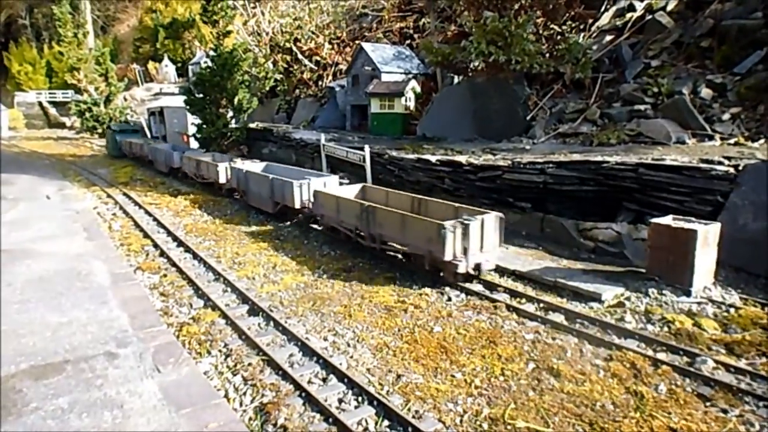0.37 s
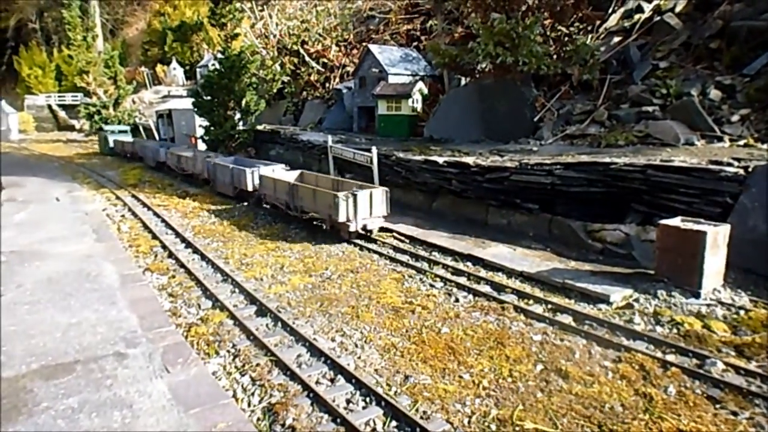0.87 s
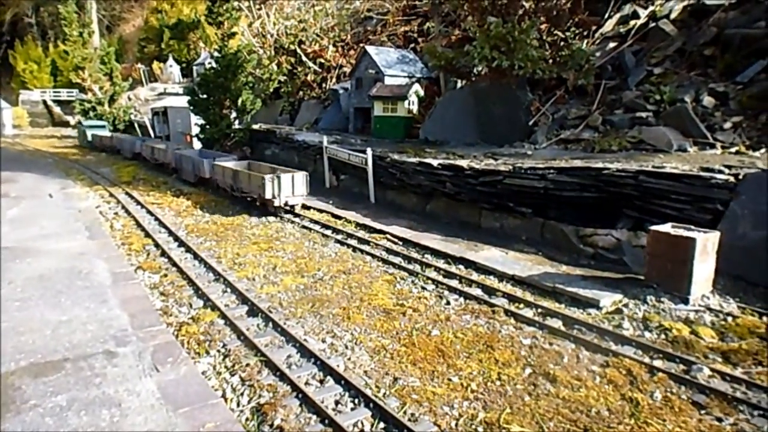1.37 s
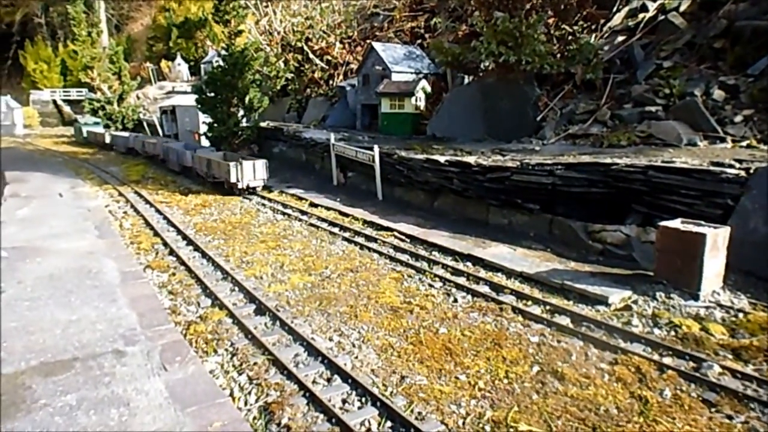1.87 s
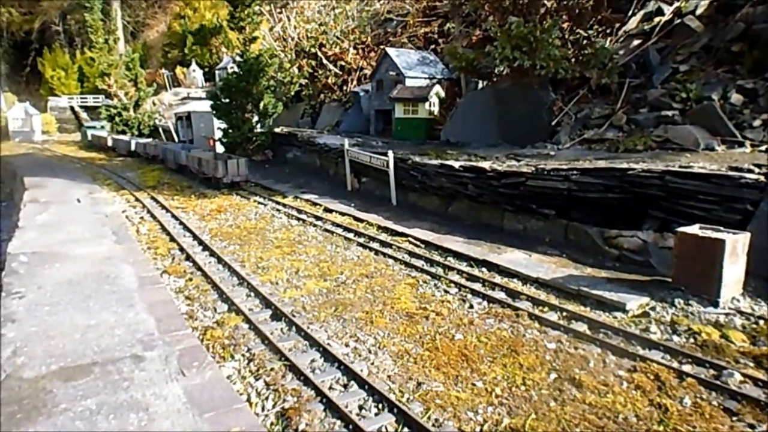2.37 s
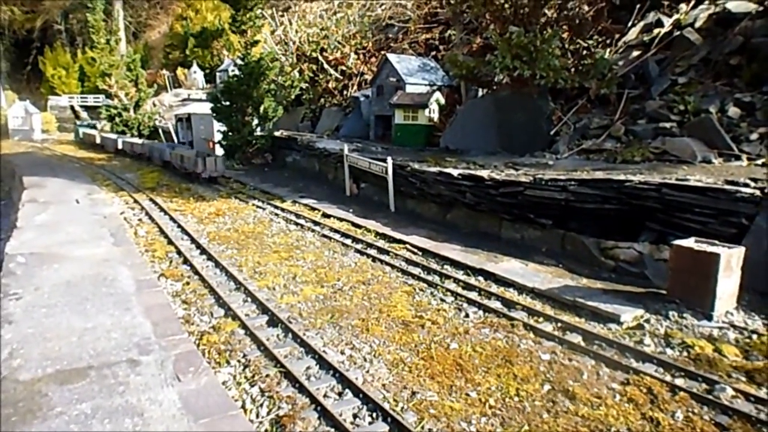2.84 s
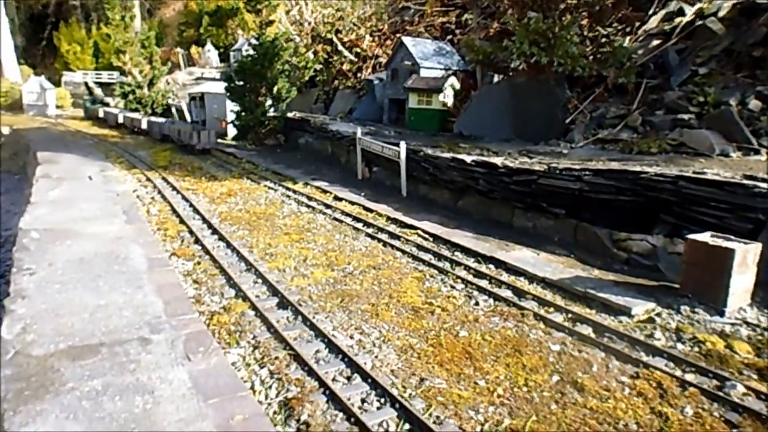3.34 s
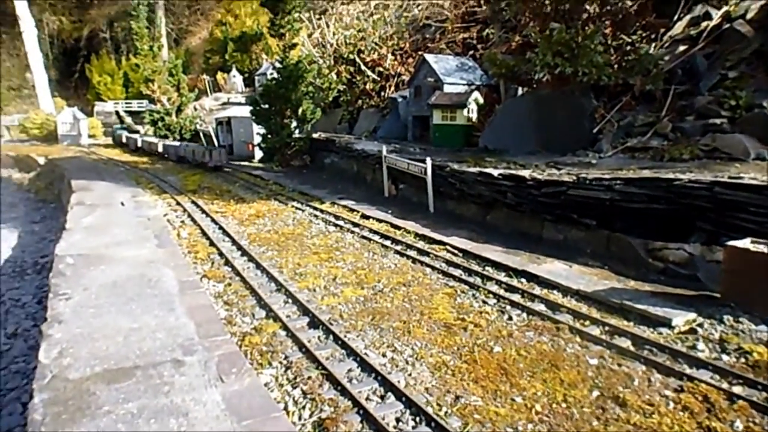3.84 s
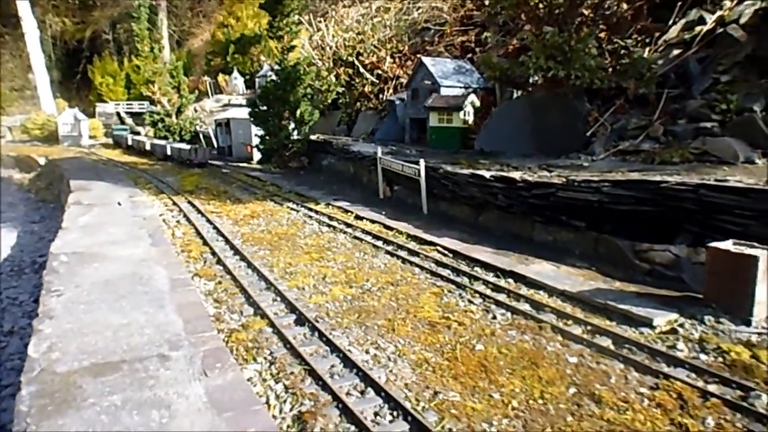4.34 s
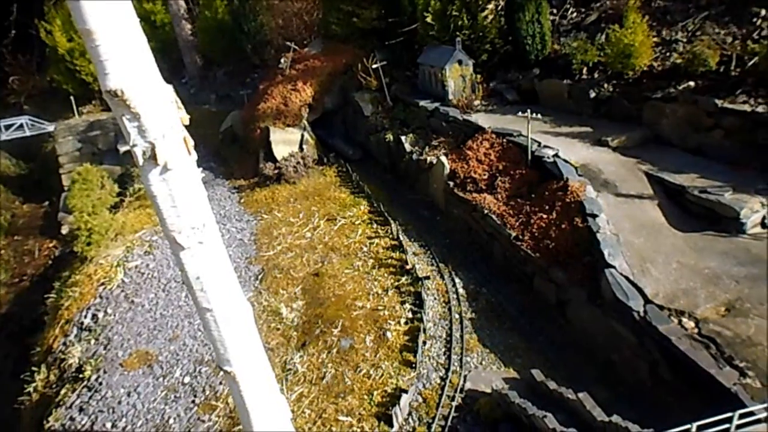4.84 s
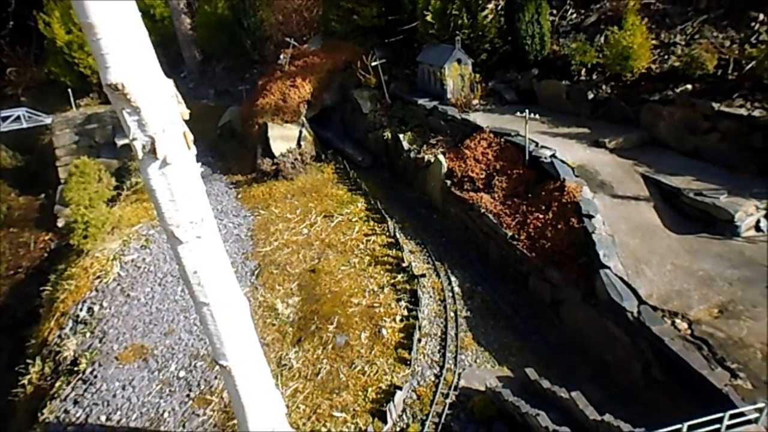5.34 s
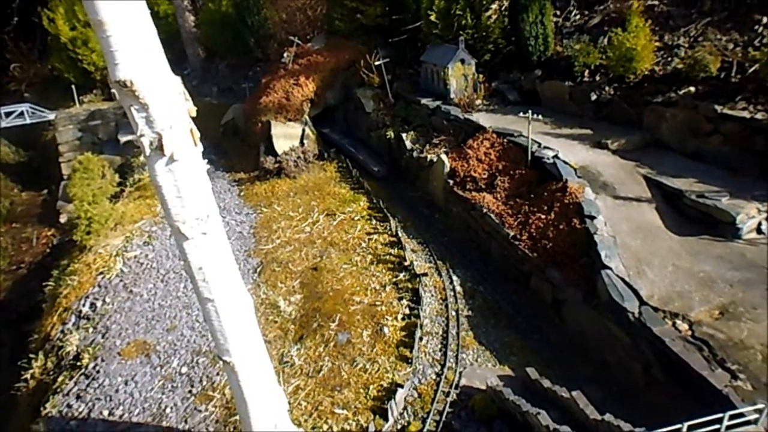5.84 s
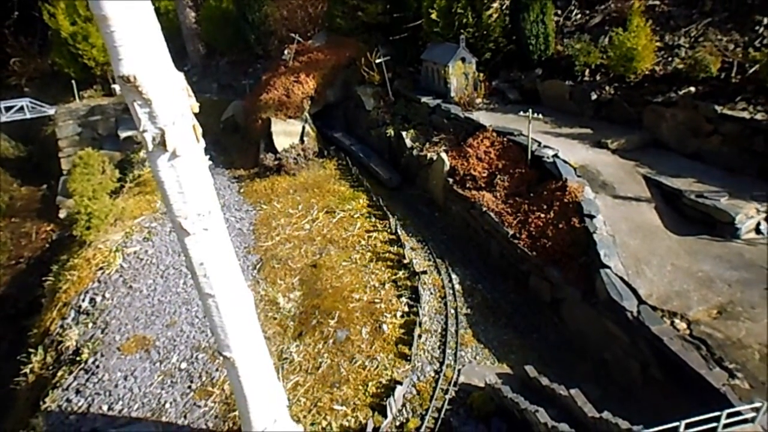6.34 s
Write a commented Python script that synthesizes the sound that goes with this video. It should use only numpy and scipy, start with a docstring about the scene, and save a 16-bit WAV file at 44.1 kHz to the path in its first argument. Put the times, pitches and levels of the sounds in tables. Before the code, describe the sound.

Outdoors at trackside, a model train clatters past and recedes: quick clacks of axles, wagon bodies and wheel rims over a grainy rolling hiss. Gusts buffet the unprotected microphone, then ease. Brief squeaky creaks and a bump from a hand end this part. The sound switches suddenly to a distant view, where a soft low hum and muffled roar continue with small thuds, light ticks and thin bird whistles.

```python
"""Beside a garden track, close to the rails, a small train of open wagons rolls away: shaped noise hisses and
rumbles, knocks ring axles, wagon bodies and wheels, and wind pushes on the microphone. Gliding tones whistle
as birds from afar; a hand makes the microphone housing tick, creak and sing. At 4.49 s the place becomes high
above a tunnel mouth: two wavering sines hum as a distant engine under a dull noise roar with thuds, while the
train still ticks far off."""
import sys
import numpy as np
from scipy import signal
from scipy.fft import rfft, irfft, next_fast_len
from scipy.io import wavfile
from scipy.ndimage import map_coordinates

SR = 44100
rng = np.random.default_rng(int(sys.argv[2]) if len(sys.argv) > 2 else 0)


def undo_db(level):
    """Turn decibels back into plain size, where 20 dB means ten times bigger."""
    steps = np.asarray(level, float) / 20
    return 10 ** steps


def wav_record(signal):
    """Record a signal, one row per channel, as 16-bit PCM in the file named by sys.argv[1]."""
    frames = np.transpose(np.atleast_2d(signal))
    bounded = np.clip(frames, -1, 1)
    # unit amplitude maps onto the largest positive 16-bit level
    quanta = np.round(bounded * 32767).astype(np.int16)
    wavfile.write(sys.argv[1], SR, quanta)


N = 284445
MOVE_S = 4.49  # the listening place changes from trackside to high above the tunnel mouth

# knocks of wheels and couplings; from 4.353 to 4.438 s ticks of the hand on the housing;
# before the trims of each ringing part: t/s, level/dB, wagon body over level/dB, wheel ring over level/dB
KNOCK_TABLE = [(0.022, -17.5, -16, -14), (0.037, -19, -9, -17), (0.048, -14.5, -10, -17),
               (0.0647, -14, -11, -16), (0.077, -15, -12, -4.5), (0.1045, -9.5, -6.5, -6.5),
               (0.118, -25, -16, -25), (0.131, -16.5, -11, -8.5), (0.142, -22, -12, -24),
               (0.17, -21.5, -11, -7), (0.191, -11, -13, -15), (0.2107, -22, -6, -18), (0.23, -10, -9, -10),
               (0.249, -13, 0, -15), (0.26, -14, -14, -13), (0.267, -16.5, -8, -8), (0.28, -16, -9, -9),
               (0.307, -22, -14, -4), (0.322, -21, -25, -16), (0.335, -22, -1, -19), (0.373, -19.5, -3, -2),
               (0.382, -17, 0, -16.5), (0.4209, -22.5, 2, -2.5), (0.467, -40, -3, 1.5),
               (0.4792, -27, -3, 2), (0.518, -18, -1, -16), (0.548, -21, -3, -24),
               (0.5662, -21.5, -9, -10.5), (0.5837, -23, -18, -12), (0.594, -24, -12, -4),
               (0.6215, -23.5, 1.5, -6), (0.687, -15, -8, -18), (0.707, -18.5, 0, -12),
               (0.763, -18.5, -9, -9), (0.8, -22, -16, -12), (0.82, -19, -19, -10), (0.852, -24.5, -10, 0),
               (0.887, -38, -10, 0), (0.902, -24, -12, -4), (0.916, -29, -13, -4), (0.9475, -21.5, -8, -3),
               (0.96, -21.5, -3, -12), (0.988, -19, -5, -8), (1.013, -29, -10, -2), (1.042, -25.5, -2, -7),
               (1.052, -27, -7, -7), (1.066, -23, -4, -13), (1.085, -18, -7, -16), (1.104, -16, -11.5, -11),
               (1.1194, -21.5, 0, 0), (1.135, -32, 4, -12), (1.165, -34, -12, -18), (1.188, -22.5, 4, -14),
               (1.227, -22.5, -9, -6), (1.239, -22, -7, -6), (1.252, -26, -5, -12), (1.354, -22, -20, -18),
               (1.361, -17.5, -13, -9), (1.4072, -25.5, 0, -15), (1.4561, -31, -11, -1),
               (1.511, -21, -2, -15), (1.5486, -22.5, 4.5, -12), (1.5668, -22.5, -13, -4),
               (1.6306, -21, -7, -20), (1.64, -23, -8, -18), (1.6855, -22, -13, -27), (1.738, -30, 3, -10),
               (1.775, -26, 1, -8), (1.8023, -25, -1, -11), (1.818, -19, -8, -13), (1.838, -30, -5, -4),
               (1.851, -25, 4, -3), (1.8728, -21, -6, -12), (1.89, -26, -7, -12),
               (1.9333, -20.5, -8, -10.5), (1.963, -23, -16, -16), (1.9992, -16.5, -7, -10),
               (2.026, -27, -2, -16), (2.083, -30, 2, -9), (2.1223, -33, -15.5, -3), (2.2985, -30, 9.5, -8),
               (2.3107, -24, -3, -12), (2.402, -24, -9, -7), (2.452, -23, -1, -17), (2.553, -30, 4.5, -13),
               (2.573, -25, -4, -15), (2.62, -26.5, -1.5, -23), (2.704, -27.5, 3, -1.5),
               (2.859, -25, 1, -8), (2.9404, -25.5, 0, -4), (3.0598, -24, -19, -1), (3.123, -27, -12, -19),
               (3.15, -28, -5, -29), (3.2107, -24, -10, -10), (3.3027, -24, -14, -12), (3.41, -25, -2, -10),
               (3.448, -26.5, 2, -20), (3.492, -16, -6.5, -9), (3.5217, -24.5, -18, -24),
               (3.545, -32, -12, -9), (3.607, -30, -12, 2), (3.616, -25, -6, -2), (3.679, -29, 0, -4),
               (3.838, -28.5, 4, 4.5), (3.894, -24.5, -6, -12), (3.92, -33, 1, 4.5), (3.948, -27.5, 0, -3),
               (3.967, -35.5, -11, 4), (4.077, -36, 3, -15), (4.112, -21.5, -10, -12),
               (4.219, -21, -15, -10.5), (4.271, -30, -6, -9), (4.314, -31, 2, -14),
               (4.353, -35.5, -10, 3.5), (4.367, -36, -6, 6), (4.3878, -29, -3, 2), (4.411, -36, -2, -2),
               (4.438, -22, -26, -20), (4.533, -34, -7, -12), (4.644, -32.5, 5, -6),
               (4.6863, -29.5, -8, -7), (4.781, -25, -9, -24), (5.031, -33.5, -7, -11),
               (5.086, -28.5, -2.5, -7), (5.218, -31, -13, -22), (5.23, -26, -19, -8),
               (5.3508, -32, -14, -7.5), (5.3883, -25.5, -20, -10), (5.5074, -31, -11, -15),
               (5.5288, -27, -14, -22), (5.542, -31, -13, -11), (5.797, -38, -14, -9),
               (5.838, -34, -14, -14), (5.95, -36, -17, -4), (6.069, -44, 2, -14), (6.179, -32.5, 4.5, -9),
               (5.8914, -43, -10, 8), (6.2864, -29.5, -12, -8), (6.346, -31, 3, 2)]


def unit(x):
    """Scaled to rms 1."""
    return x / np.sqrt(np.mean(x ** 2) + 1e-20)


def curves(rows):
    """One value per sample for each column, and a gate that is open while the table lasts."""
    s, *columns = np.transpose(rows)
    t = np.arange(N) / SR
    gate = np.clip(np.minimum(t - s[0], s[-1] - t) / 0.004 + 1, 0, 1)  # 4 ms ramps outside the table
    return [np.interp(t, s, column) for column in columns] + [gate]


def wobble(rate):
    """A smooth random curve, rate knots a second."""
    knots = rng.standard_normal(int(N * rate / SR) + 4)
    return map_coordinates(knots, [np.arange(N) * rate / SR])


def swells(s, db, rise_s, fall_s, base_db):
    """dB over time: a base plus, in power, swells that rise and fall by 10 dB in rise_s and fall_s."""
    t = np.arange(0, N, 32) / SR  # a coarse grid is enough for slow curves
    late = t - np.asarray(s)[:, None]
    rising = -late / np.reshape(rise_s, (-1, 1))
    falling = late / np.reshape(fall_s, (-1, 1))
    slope = np.where(late < 0, rising, falling)
    power = undo_db(2 * (np.asarray(db)[:, None] - 10 * slope)).sum(axis=0)
    return 10 * np.log10(np.interp(np.arange(N) / SR, t, power) + undo_db(2 * base_db))


def filtered(x, response):
    """x times a complex response of frequency."""
    m = next_fast_len(N + 8192)
    return irfft(rfft(x, m) * response(np.fft.rfftfreq(m, 1 / SR)), m)[:N]


def noise(spectrum):
    """Noise of rms 1 with a (Hz, dB) spectrum, interpolated over log frequency."""
    f, db = np.transpose(spectrum)
    return unit(filtered(rng.standard_normal(N),
                         lambda hz: undo_db(np.interp(np.log(hz + 1), np.log(f + 1), db))))


def resonance(hz, width):
    """Causal response of one mode, applied twice for steep skirts."""
    return lambda f: (1j * f * width / (hz * hz - f * f + 1j * f * width)) ** 2


def rung(force, modes):
    """Contact noise under a force curve, one row per mode, rings the modes; rms 1 for a force of 1."""
    tone = 0
    for push, (hz, width, db) in zip(force, modes):
        contact = push * rng.standard_normal(N)
        tone = tone + undo_db(db) / np.sqrt(width) * filtered(contact, resonance(hz, width))
    mode_power = np.sum(undo_db(np.transpose(modes)[2]) ** 2)
    return tone / np.sqrt(np.pi / 2 / SR * mode_power)


def struck(times, dbs, modes, spot_db, short):
    """Each blow is a brief swell of contact noise with a faint tail; its spot sets mode levels and delays."""
    u = np.arange(SR // 10) / SR / short
    swell = u ** 3 * np.exp(-1.2 * u)
    tail = 0.3 * (1 - np.exp(-u)) ** 3 * np.exp(-u / 8)
    chatter = swell + tail
    spots, lags = rng.standard_normal((len(times), 2, len(modes))).transpose(1, 2, 0)
    blows = []
    for spot, lag in zip(spots, lags):
        at = np.abs((times + short * (lag - 1)) * SR).astype(int)
        blows.append(np.bincount(at, undo_db(dbs + spot_db * spot), N)[:N])
    force = signal.fftconvolve(blows, [chatter / chatter.max()], axes=1)[:, :N]
    return rung(force, modes)


def whistle(rows, flutter_db, waver):
    """A thin tone along (s, Hz, dB rms) rows, unsteady in level and pitch."""
    hz, db, gate = curves(rows)
    turn = 2 * np.pi * np.cumsum(hz * (1 + waver * wobble(210))) / SR
    return np.sqrt(2) * gate * undo_db(db + flutter_db * wobble(90)) * np.sin(turn)


def rolling_hiss(roll_db):
    """Wheels hiss on the rails: shaped noise whose level flickers at three speeds."""
    # hiss spectrum: f/Hz, relative density/dB
    spectrum = [(120, -33.5), (200, -0.5), (441, -9), (1020, -1), (1280, -7.5), (1510, -3), (2050, -8.5),
                (2320, -6), (3550, -13.5), (5270, -16), (7600, -20), (9880, -55), (16700, -120)]
    flicker_db = 1.6 * wobble(5.13) + 1.1 * wobble(19) + 1.1 * wobble(60)
    return undo_db(roll_db - 2.0 + flicker_db) * noise(spectrum)


def track_rumble(lost_db):
    """The track bed rumbles: low noise that loses 0.79 dB for each dB of rolling lost."""
    # rumble spectrum: f/Hz, relative density/dB
    spectrum = [(41, -40), (70, -6.5), (122, 1.5), (188, -12), (260, -17.5), (340, -21.5), (570, -120)]
    return undo_db(-36 + 0.79 * lost_db + 1.5 * wobble(25.11)) * noise(spectrum)


def wagon_boom():
    """The hollow wagons boom steadily and at each knock, both dropping as the train draws away."""
    # boom of the hollow wagons: f/Hz, width/Hz, level/dB
    modes = [(504, 320, 0)]
    drop_db_per_s = -8
    t = np.arange(N) / SR
    steady_db = np.maximum(-39 + drop_db_per_s * t, -56.5)  # never below the second figure
    steady = rung([undo_db(steady_db + 2.4 * wobble(21))], modes)
    s, db, body_db, _ = np.transpose(KNOCK_TABLE)
    knock_db = db + body_db - 11.5 + drop_db_per_s * s
    return steady + struck(s, knock_db, modes, spot_db=3.5, short=0.0016)


def hum(roll_db):
    """Wagons hum, loudest with open ends to the listener; a rail note and a broad axle band follow the rolling."""
    # one wagon mode, one rail note, one broad rattling axle band: f/Hz, width/Hz, level/dB
    modes = [(857, 200, 0.45), (1031, 67, -1.8), (2530, 750, -0.14)]
    peak_s, span_s = 1.25, 1.19  # time of the peak, time from it to lose 6 dB
    t = np.arange(N) / SR
    wagon_db = -38 - 6 * ((t - peak_s) / span_s) ** 2 + 0.82 * wobble(5.6)
    levels_db = (wagon_db, roll_db - 6.0, roll_db - 7.5 + 2.8 * wobble(12))
    return rung([undo_db(db + 1.26 * wobble(24.88) + 1.8 * wobble(80)) for db in levels_db], modes)


def clatter(times, db, body_db, wheel_db, spot_db):
    """A knock sounds in the axle, the wagon body and the wheel rims together."""
    # ringing modes of the axles: f/Hz, width/Hz, level/dB
    axle_modes = [(2375, 314, 2.5), (2719, 380, 0), (3048, 420, 0.5), (3495, 530, -6), (3950, 580, -4)]
    # ringing modes of the wagon bodies: f/Hz, width/Hz, level/dB
    body_modes = [(811, 540, 1), (1043, 260, -1.5), (1479, 330, 1), (1890, 470, -2.5)]
    # ringing modes of the wheel rims: f/Hz, width/Hz, level/dB
    wheel_modes = [(4430, 650, 4), (4950, 400, 1.5), (5380, 540, 5), (5940, 450, 1.5), (6510, 580, 2),
                   (7120, 600, -0.5), (7780, 690, -2.5)]
    axle = struck(times, db - 13.0, axle_modes, spot_db, short=0.0012)
    body = struck(times, db + body_db - 9.5, body_modes, spot_db / 2, short=0.0011)
    wheel = struck(times, db + wheel_db - 7.0, wheel_modes, spot_db, short=0.00073)
    return axle + body + wheel


def rattle(lost_db, near):
    """Loose parts patter in small knocks, a few louder than the rest, swelling at every jolt."""
    # jolts that shake the loose parts: t/s, swell of the patter before its trims, level/dB
    jolts = [(0.07, -40), (0.108, -29.5), (0.198, -43), (0.24, -26), (0.27, -33), (0.384, -28), (0.49, -29),
             (0.57, -27.5), (0.69, -28.5), (0.95, -36), (1.11, -28), (1.26, -38), (1.36, -38.5),
             (1.69, -31), (1.845, -35), (2.949, -43), (3.072, -42), (3.27, -35), (3.5, -36.5), (3.837, -30),
             (3.969, -36.5), (4.11, -47), (4.23, -41), (4.32, -34), (4.41, -51), (4.47, -39), (5.04, -42),
             (5.53, -42), (6.365, -34)]
    base_db = np.where(near, -38.5 + lost_db, -47.5)  # trackside, then from the second place
    shake_db = swells(*np.transpose(jolts), rise_s=0.039, fall_s=0.023, base_db=base_db + 2.0 * wobble(9))
    when, luck, body, wheel = rng.random((1600, 4)).T
    at = (when * (N - 1)).astype(int)
    knock_db = shake_db[at] - 2.5 - 2.0 * np.log(luck + 0.026)  # low luck is a loud knock
    return clatter(at / SR, knock_db, 14 * body - 13, 14 * wheel - 16, spot_db=6)


def train():
    """Hiss, rumble, boom and hum at the trackside only; rattle and the table's knocks in both places."""
    # the train draws away: t/s, loudness of the rolling before trims, level/dB
    drawing_away = [(0.0, -33), (0.5, -36), (1.0, -36), (1.8, -38.5), (2.3, -39), (2.75, -41),
                    (3.25, -38.5), (4.0, -41), (4.49, -41)]
    alongside_db = -34  # rolling with the last wagon alongside, on the same scale
    near = np.arange(N) / SR < MOVE_S
    roll_db = curves(drawing_away)[0]
    lost_db = roll_db - alongside_db
    trackside = rolling_hiss(roll_db) + track_rumble(lost_db) + wagon_boom() + hum(roll_db)
    knocks = clatter(*np.transpose(KNOCK_TABLE), spot_db=2.8)
    return near * trackside + rattle(lost_db, near) + knocks


def wind():
    """Lumpy pressure on the microphone, its swings bounded; strong gusts reach higher, with flicks by eddies."""
    # gusts on the microphone: t/s, level/dB, rise by 10 dB/s, fall by 10 dB/s
    gusts = [(0.031, -23.5, 0.045, 0.14), (0.271, -17, 0.037, 0.04), (0.48, -19.5, 0.019, 0.081),
             (0.64, -22.5, 0.033, 0.016), (0.701, -26.5, 0.02, 0.025), (0.954, -20, 0.038, 0.036),
             (1.28, -49, .035, 0.027), (1.48, -27, 0.067, 0.026), (1.7, -36, 0.096, 0.18),
             (1.825, -30, 0.044, 0.041), (2.01, -45.5, .035, 0.13), (2.22, -40, 0.054, .025),
             (2.47, -38, 0.4, 0.013), (2.54, -41, .022, 0.15), (2.83, -42.5, 0.037, 0.3),
             (3.119, -34, 0.013, 0.043), (3.26, -30.5, 0.079, 0.045), (3.4, -37, 0.083, 0.24),
             (3.58, -37.5, 0.051, 0.087), (3.649, -28, 0.023, 0.0085), (3.8, -39, 0.046, 0.016),
             (3.89, -42, 0.013, .015), (3.98, -40, 0.031, .02), (4.22, -46, 0.072, 0.19),
             (4.325, -46, 0.045, .01)]
    # eddies that flick the microphone: t/s, peak level/dB, length/s
    flick_table = [(0.02, -19, 0.0018), (0.067, -15.5, 0.0024), (0.226, -14.5, 0.0015),
                   (0.2375, -20, 0.0027), (0.254, -14.5, 0.0022), (0.484, -18.5, 0.0011),
                   (0.513, -15.5, 0.0038), (0.58, -19.5, 0.0023), (0.926, -17, 0.0028),
                   (0.948, -15, 0.0019), (0.9632, -12.5, 0.0034), (0.985, -20.5, 0.0027),
                   (1.8546, -27, 0.0055), (3.124, -25, 0.0059), (3.572, -28.5, 0.0077),
                   (3.596, -26.5, 0.0043)]
    # spectrum of the low push: f/Hz, relative density/dB
    push_spectrum = [(12, -17), (25, 1.5), (50, -8), (90, -7.5), (150, -32.5), (300, -51.5)]
    # spectrum of the higher edge of gusts: f/Hz, relative density/dB
    edge_spectrum = [(40, -46.5), (90, -12), (190, 0.5), (350, -13), (700, -41)]
    t = np.arange(N) / SR
    breeze_db = -30.5 - 7 * t  # the steady part dies down
    db = swells(*np.transpose(gusts), breeze_db)
    push = undo_db(db) * unit(np.tanh(0.7 * noise(push_spectrum)))
    lumps = undo_db(2.5 * wobble(25))
    edge = undo_db(1.57 * db - 1.5) * unit(lumps * noise(edge_spectrum))
    flicks = 0
    for s, peak_db, length in flick_table:
        u = ((t - s) / length) ** 2 / 2
        flicks = flicks + undo_db(peak_db) * (2 * u - 1) * np.exp(-u)
    return (t < MOVE_S) * (push + edge + flicks)


def birds():
    """Far whistles that glide, swell and fade, smeared by foliage that scatters them."""
    # bird whistles: start t/s, length/s, first f/Hz, last f/Hz, level in the middle/dB
    calls_table = [(-0.1, 0.19, 7470, 7050, -44.5), (3.415, .045, 3800, 3900, -49.5),
                   (3.75, .08, 5780, 5800, -58), (4.125, 0.03, 7350, 7200, -56),
                   (4.11, 0.05, 6600, 6500, -54), (4.15, .04, 6400, 5800, -56), (4.2, .29, 7720, 7600, -58),
                   (5.656, 0.27, 7550, 6660, -60), (5.955, 0.19, 7260, 6980, -56)]
    end_db = -8  # at both ends of a whistle, relative to its middle
    scatter_db, scatter_t60_s = -6, 0.1
    calls = 0
    for s, length, first_hz, last_hz, db in calls_table:
        rows = [(s, first_hz, db + end_db),
                (s + length / 2, (first_hz + last_hz) / 2, db),
                (s + length, last_hz, db + end_db)]
        calls = calls + whistle(rows, flutter_db=4, waver=0.007)
    t = np.arange(SR // 8) / SR
    tail = rng.standard_normal(len(t)) * undo_db(-60 * t / scatter_t60_s)
    scattered = signal.fftconvolve(calls, tail / np.linalg.norm(tail))[:N]
    return calls + undo_db(scatter_db) * scattered


def hand():
    """The microphone housing creaks in slips under a finger, sings, and takes one bump."""
    # slips of a finger: t/s, length/s, force before doubling in each of the first three modes, level/dB
    slips = [(4.362, 0.01, -40, -58, -53), (4.388, 0.0077, -45, -45, -40.5),
             (4.398, 0.018, -36.5, -44, -58), (4.437, 0.018, -51, -59, -66),
             (4.466, 0.017, -41, -58, -45.5)]
    # ringing modes of the housing, the broad wall mode last: f/Hz, width/Hz, level/dB
    modes = [(2200, 170, 0), (4800, 110, 0), (5500, 150, 0), (1600, 900, 0)]
    # the housing sings under the finger: t/s, f/Hz, level/dB
    song = [(4.356, 3450, -48), (4.374, 3450, -49), (4.382, 3440, -62), (4.39, 3440, -47),
            (4.443, 3410, -47), (4.452, 3410, -60), (4.462, 3400, -53), (4.486, 3380, -54)]
    # a bump on the housing: t/s, peak level/dB, length/s
    bump = (4.372, -17, .003)
    t = np.arange(N) / SR
    force = 0
    for s, length, *dbs in slips:
        mode_dbs = dbs + [dbs[0] - 2.5]  # the wall mode follows the first one
        force = force + undo_db(mode_dbs)[:, None] * ((t > s) & (t < s + length))
    creak = 2 * rung(force, modes)
    sing = whistle(song, flutter_db=2, waver=0.005)
    s, bump_db, length = bump
    return creak + sing - undo_db(bump_db) * np.exp(-((t - s) / length) ** 2)


def engine():
    """A distant engine hums: its two lowest orders as sines of wavering pitch, led by its effort."""
    # the engine's effort: t/s, relative level/dB
    effort = [(4.49, 0.5), (4.9, -1.5), (5.4, -2), (5.55, 4.5), (5.7, 2), (5.8, -0.5), (6.45, -2.5)]
    base_hz, waver = 56.4, 0.0201  # waver is a fraction of the pitch
    turn = 2 * np.pi * np.cumsum(base_hz * (1 + waver * wobble(7.1))) / SR
    effort_db = curves(effort)[0]
    first = undo_db(-47.5 + effort_db + 1.1 * wobble(13)) * np.sin(turn)
    second = undo_db(-54 + effort_db + 2.7 * wobble(8.5)) * np.sin(2 * turn)
    return np.sqrt(2) * (first + second)  # the dB above are rms


def roar():
    """A dull roar of shaped noise, slowly sinking, with dull thuds ringing in its low part."""
    # roar spectrum: f/Hz, relative density/dB
    spectrum = [(12, -41), (20, -4.5), (58, -3.5), (126, -8), (161, -7.5), (506, -4), (717, -5.5),
                (1630, -17), (2680, -19), (6080, -26.5), (7050, -25.5), (7600, -23), (9880, -55),
                (16700, -120)]
    # thuds: t/s, level/dB
    thuds = [(4.63, -42), (4.89, -40.5), (4.945, -48), (5.66, -39.5), (5.85, -49), (6.4, -46)]
    # the one mode of the thuds: f/Hz, width/Hz, level/dB
    thud_mode = [(296, 190, 0)]
    since_move_s = np.arange(N) / SR - MOVE_S
    steady = undo_db(-40.5 - 0.5 * since_move_s + 0.9 * wobble(15)) * noise(spectrum)
    thud_db = swells(*np.transpose(thuds), rise_s=0.027, fall_s=0.024, base_db=-62 + 2.5 * wobble(12))
    return steady + rung([undo_db(thud_db)], thud_mode)


def faraway():
    """Roar and engine, heard only from the second place."""
    gate = np.arange(N) >= MOVE_S * SR
    return gate * (roar() + engine())


def scene():
    """Everything that reaches one microphone, on one channel."""
    return (train() + wind() + birds() + hand() + faraway())[None]


def band_limit(x):
    """A steep low-pass at the top of the band."""
    return signal.sosfilt(signal.butter(12, 8650, fs=SR, output="sos"), x)


def record(dry):
    """The recorder rolls off steeply, at half power by 7510 Hz."""
    mix = filtered(dry[0], lambda hz: 1 / np.sqrt(1 + (hz / 7510) ** 70))[None]
    return band_limit(mix)


dry = scene()
out = record(dry)
wav_record(out)
```